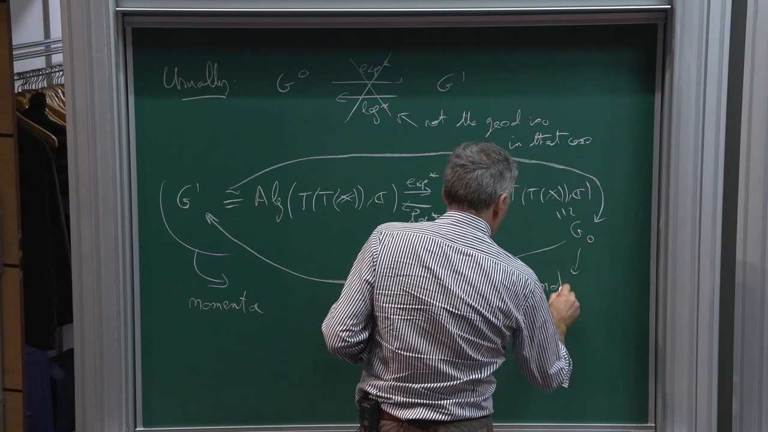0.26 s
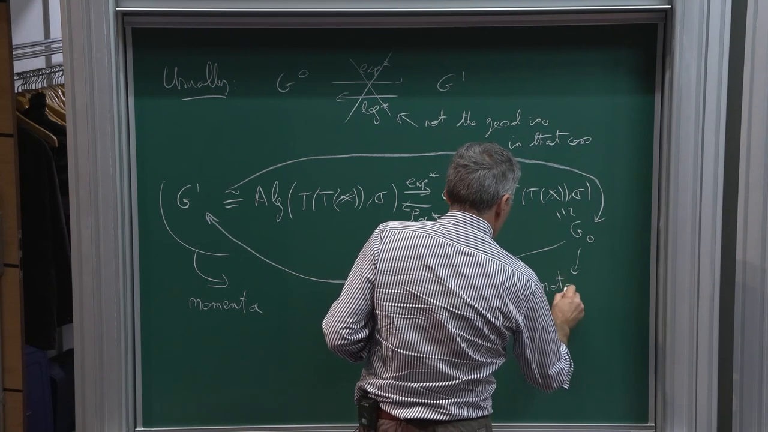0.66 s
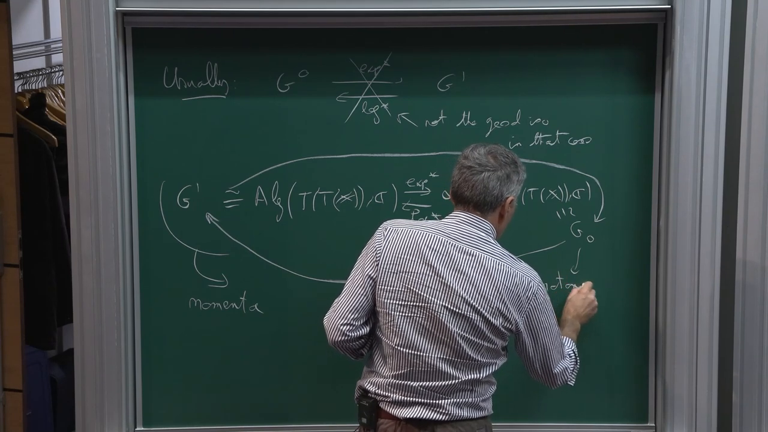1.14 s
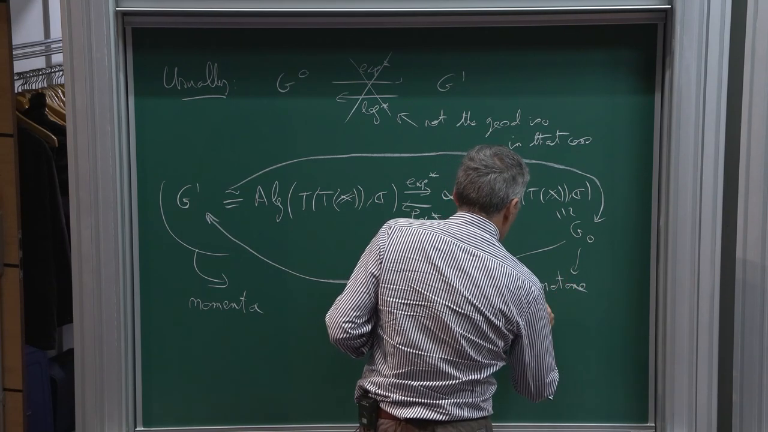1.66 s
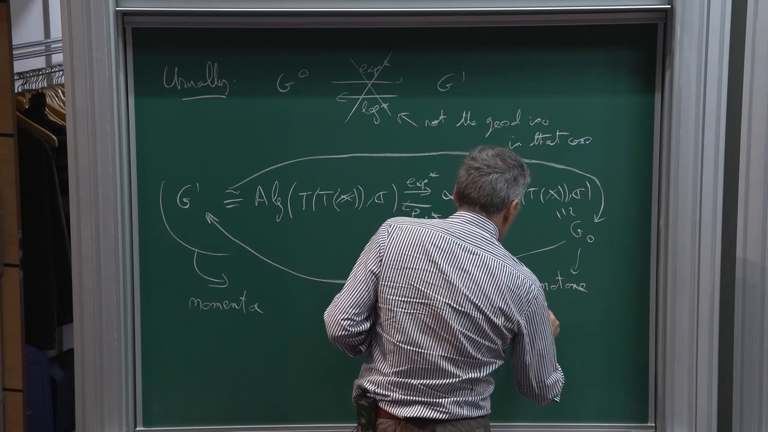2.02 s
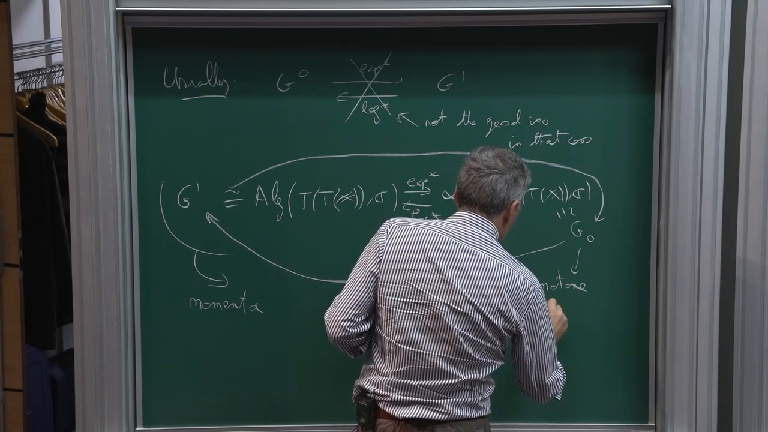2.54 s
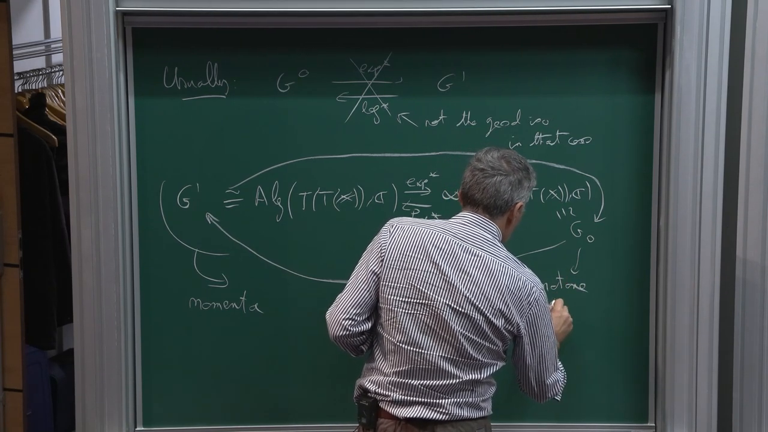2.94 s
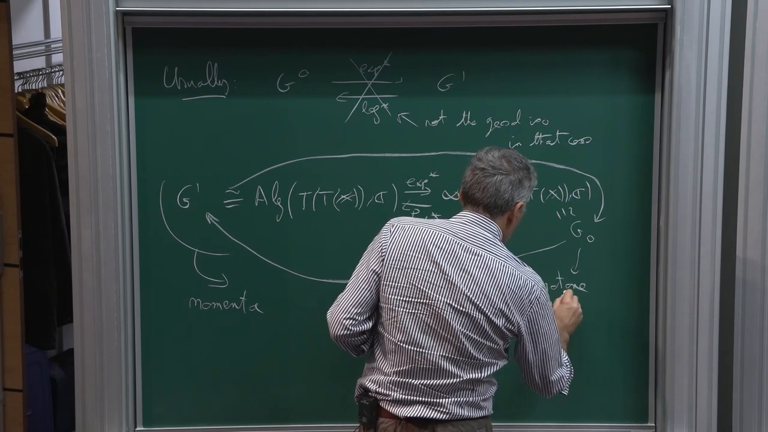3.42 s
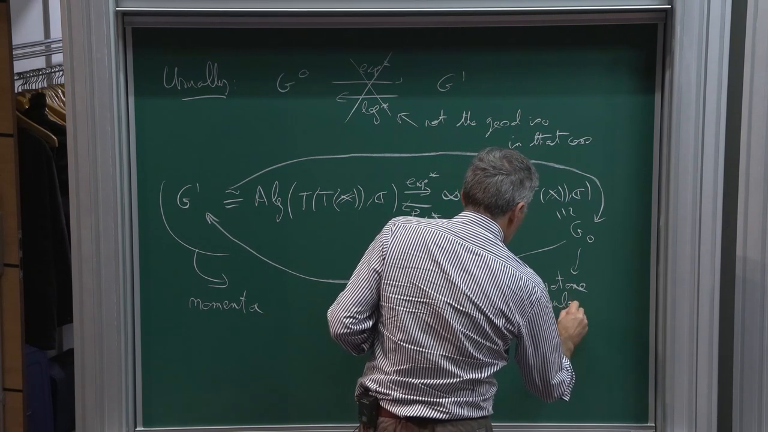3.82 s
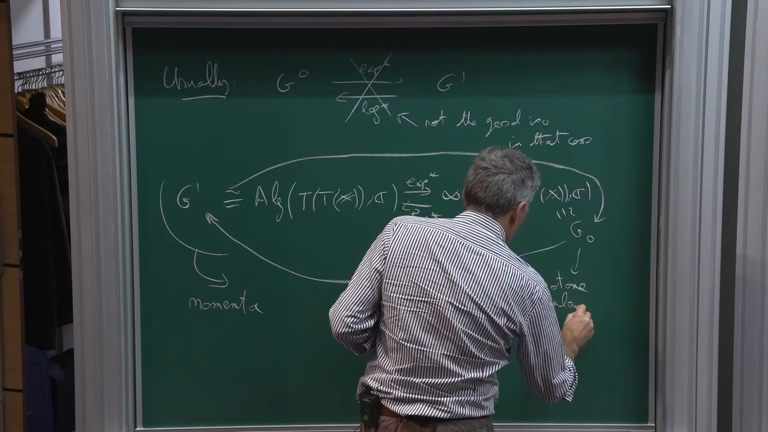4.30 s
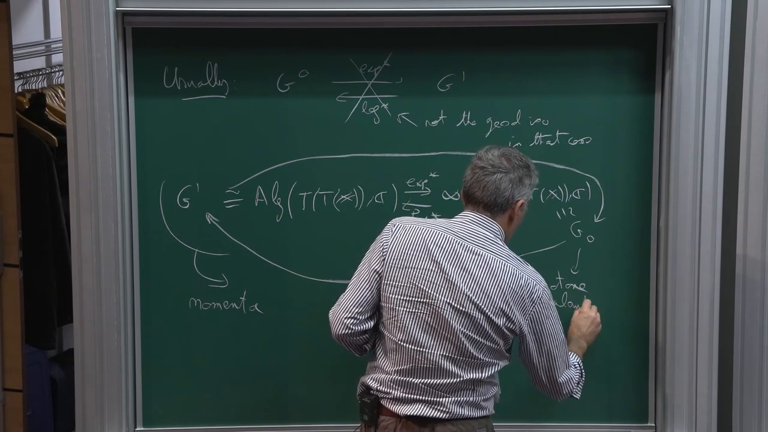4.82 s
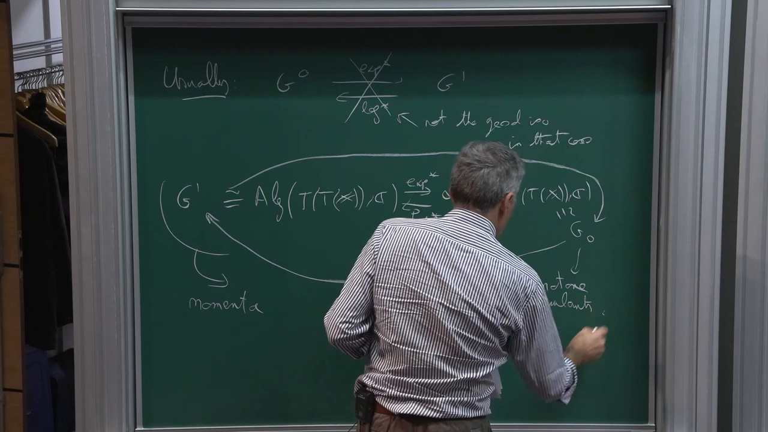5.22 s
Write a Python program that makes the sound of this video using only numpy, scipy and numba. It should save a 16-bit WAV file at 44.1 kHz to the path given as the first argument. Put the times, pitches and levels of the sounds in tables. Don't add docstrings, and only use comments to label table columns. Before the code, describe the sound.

In a quiet lecture room, chalk writes on a large board, heard through a small microphone on the writer's shirt. Soft ventilation rumble, steady thin hiss and restless cloth rustle run throughout. From 0 s, faint gritty strokes swell and halt at each turn. A sharp knock of chalk on board lands at 0.25 s, with another at 0.66 s; light touches and brittle crumb snaps cluster around 0.4-0.55 s. Scratching continues, with a tap at 1.4 s, dull cloth bumps at 1.05 and 1.55 s, and a knock at 1.8 s. The second word begins with a knock at 2.5 s, followed by even scrapes and faint squeaky tones. A short stuttering judder comes at 3.45 s, a duller knock at 3.75 s, low cloth thuds around 4.1 s and a weaker judder at 4.2 s. Two hard clacks, at 5.0 and 5.17 s, the second loudest and brightest, precede the last faint strokes.

```python
import sys
import numpy as np
from scipy import signal
from scipy.fft import rfft, irfft
from scipy.io import wavfile
from scipy.ndimage import uniform_filter1d
from numba import njit

SR = 44100
rng = np.random.default_rng(int(sys.argv[2]) if len(sys.argv) > 2 else 0)


def dump_mix(stems):
    frames = np.atleast_2d(stems).T
    limited = np.clip(frames, -1, 1)
    pcm = np.round(limited * 32767).astype(np.int16)
    wavfile.write(sys.argv[1], SR, pcm)


def natural_amplitude(level_db):
    exponent = np.asarray(level_db, float) / 20
    return 10 ** exponent


N = 240518
TIME = np.arange(N) / SR


def unit(x):
    return x / np.sqrt(np.mean(x ** 2))


def noise(n):
    return rng.standard_normal(n)


def colour(x, points):
    hz, db = np.transpose(points)
    f = np.fft.rfftfreq(len(x), 1 / SR) + 1
    gain = natural_amplitude(np.interp(np.log(f), np.log(hz), db, left=-90, right=-90))
    return unit(irfft(rfft(x) * gain, len(x)))


def band(x, lo_hz, hi_hz):
    return signal.sosfilt(signal.butter(2, [lo_hz, hi_hz], "band", fs=SR, output="sos"), x)


@njit
def svf(x, hz, width_hz):
    y, b, l = np.empty(len(x)), 0., 0.
    for i in range(len(x)):
        g = np.tan(np.pi * hz[i] / SR)
        k = width_hz / hz[i]
        v = (b + g * (x[i] - l)) / (1 + g * (g + k))
        b = 2 * v - b
        l = l + 2 * g * v
        y[i] = k * v
    return y


def fade(t, t60_s):
    return np.exp(-np.log(1000) * t / t60_s)


def rise(t, rise_s):
    return np.minimum(t / rise_s, 1)


def walk(rate_hz):
    k = int(SR / rate_hz)
    return 1.2 * uniform_filter1d(np.repeat(noise(N // k + 1), k), k)[:N]


def add(out, s, sound):
    i = int(s * SR)
    out[i:i + len(sound)] += sound[:N - i]


def ring(modes, t, scatter_db, drift):
    hz, db, t60_s = np.transpose(modes)[:, :, None]
    chance = rng.standard_normal((2, len(modes), 1))
    level = natural_amplitude(db + scatter_db * chance[0]) * fade(t, t60_s)
    sound = np.sum(level * np.sin(2 * np.pi * hz * (1 + drift * chance[1]) * t), axis=0)
    return sound / np.abs(sound).max()


def clusters(modes, centre_hz, fall_db, count=3):
    return [(hz, db - fall_db * np.log2(hz / centre_hz) ** 2, t60_s) for hz, db, t60_s in modes] * count


def rubbed(modes, grains, damping, drift):
    out, bend = 0, 1 + drift * walk(6.8)
    for hz, db, t60_s in modes:
        width_hz = damping * np.log(1000) / np.pi / t60_s
        drive = grains * natural_amplitude(db + 2.5 * walk(14))
        out = out + svf(drive, hz * bend, width_hz) / np.sqrt(width_hz / SR)
    return out / np.linalg.norm(natural_amplitude(np.array(modes)[:, 1]))


# f/Hz, level/dB per Hz
RUMBLE = [(8.8, -58), (15, 14.5), (43, -7.5), (101, 6.5), (175, -5.5), (257, -9.5), (454, -17),
          (999, -26.5), (1090, -127), (1200, -120), (1560, -36.5), (2640, -120)]
# f/Hz, level/dB per Hz
HISS = [(400, -10), (700, 0), (2600, -8), (3800, -10), (5000, -5), (6300, -3), (8500, -9), (12700, -13),
        (13100, -50), (16000, -60)]
# t/s, rustle level/dB
STIR = [(0.0, -62.5), (0.4, -61), (1.05, -58), (1.4, -56.5), (1.65, -65.5), (1.9, -58), (2.3, -60.5),
        (2.85, -62), (3.45, -67), (3.64, -61.5), (3.75, -59), (4.1, -65), (4.25, -59), (4.6, -58),
        (4.8, -59.5), (5.1, -60.5), (5.45, -59.5)]


def air():
    stir_db = np.interp(TIME, *np.transpose(STIR)) + 1.5 * walk(16)
    low = colour(noise(N), RUMBLE)
    deep_db = -56.5 + 0.62 * (stir_db - stir_db.mean()) + 0.37 * walk(22) + walk(25)
    rustle_db = stir_db + 3 + 0.3 * walk(7) + 1.4 * walk(30)
    deep = unit(band(low, 24, 113.6)) * natural_amplitude(deep_db)
    rustle = unit(band(low, 141.4, 800)) * natural_amplitude(rustle_db)
    hiss = colour(noise(N), HISS) * natural_amplitude(-71 + 0.4 * walk(9.6))
    return deep + rustle + hiss


# t/s, peak level/dB, f/Hz, t60/s
BUMPS = [
    (0.415, -55.5, 195, 0.074),
    (1.045, -46.5, 106, 0.14),
    (1.565, -45, 127, 0.0054),
    (4.069, -51.5, 78.4, 0.14),
    (4.148, -38, 118, 0.028),
    (4.322, -55, 330, 0.036),
]


def cloth_bumps():
    out, t = np.zeros(N), TIME[:SR // 5]
    for s, db, hz, t60_s in BUMPS:
        thud = np.sin(2 * np.pi * hz * t * (0.98 + 1.2 * fade(t, 0.035)))
        add(out, s, natural_amplitude(db + 9.5) * thud * fade(t, t60_s))
    return out


# t/s, peak level/dB, f/Hz
SNAPS = [(0.2268, -40, 5960), (0.395, -39.5, 5300), (0.4204, -40, 7300), (0.466, -43, 7600),
         (0.465, -53.5, 2600), (4.146, -46.5, 1700), (1.477, -50, 9000), (1.487, -45.5, 8600),
         (1.52, -42, 6360), (1.5367, -43, 5950), (2.2653, -44, 4870), (3.629, -48, 6340),
         (3.697, -47, 11500), (1.52, -54, 1950), (1.537, -52.5, 1950), (4.714, -53, 1182),
         (4.714, -43, 5000)]


def snaps():
    out, t = np.zeros(N), TIME[:SR // 5]
    for s, db, hz in SNAPS:
        burst = noise(len(t)) * fade(t, 0.0084) * rise(t, 0.0016)
        snap = band(burst, hz / 1.29, min(hz * 1.28, 13000))
        add(out, s, natural_amplitude(db) * snap / np.abs(snap).max())
    return out


# t/s, length/s, f/Hz, width/octaves, level/dB
GRINDS = [(0.402, 0.037, 1120, 0.66, -55), (0.531, 0.068, 1300, 1.1, -59), (0.53, 0.034, 8400, 0.72, -48),
          (1.207, 0.055, 1390, 0.29, -52.5), (1.369, 0.058, 1240, 1.6, -54), (1.12, 0.25, 6900, 0.25, -70),
          (1.24, 0.073, 10500, 0.3, -54), (1.905, 0.17, 1700, 0.87, -62), (1.2, 0.088, 11000, 0.26, -55),
          (2.618, 0.1, 1700, 0.84, -61.5), (2.82, 0.15, 1800, 1.6, -64), (3.029, 0.077, 1540, 0.96, -55.5),
          (3.033, 0.06, 8800, 0.26, -53), (3.12, 0.07, 9800, 0.31, -67), (3.214, 0.076, 1900, 0.4, -59),
          (3.36, 0.19, 1810, 1.2, -56), (3.333, 0.21, 7800, 0.68, -55), (3.626, 0.045, 6740, 0.27, -54),
          (3.62, 0.079, 1370, 0.86, -61.5), (3.823, 0.12, 1850, 0.69, -57.5), (4.169, 0.1, 1700, 0.96, -61),
          (4.219, 0.19, 730, 0.86, -63), (3.75, 0.08, 550, 0.5, -58), (1.2, 0.1, 3200, 0.76, -62),
          (4.493, 0.066, 790, 0.56, -60), (4.441, 0.14, 1650, 0.88, -58), (4.598, 0.09, 6100, 0.31, -60),
          (4.771, 0.077, 2000, 0.41, -64), (5.243, 0.23, 5500, 0.98, -61.5)]


def grinds():
    out = np.zeros(N)
    for s, length_s, hz, octaves, db in GRINDS:
        part = np.linspace(0, 1, int(length_s * SR))
        size_db = 2 * np.minimum(rng.exponential(size=len(part)), 5)
        grit = noise(len(part)) * natural_amplitude(size_db)
        half = 2 ** (octaves / 2)
        add(out, s, natural_amplitude(db) * unit(band(grit, hz / half, hz * half)) * np.sin(np.pi * part))
    return out


# t/s, length/s, start f/Hz, end f/Hz, level/dB
SINGS = [(0.518, 0.066, 2650, 2670, -78), (0.526, 0.033, 7800, 7640, -55), (0.535, 0.047, 1610, 1600, -54),
         (0.551, 0.033, 1030, 1025, -51.5), (0.86, 0.056, 5070, 5130, -68), (1.027, 0.041, 1290, 1330, -60),
         (1.105, 0.053, 5160, 5050, -60), (1.121, 0.1, 2470, 2370, -61.5), (1.33, 0.078, 2460, 2440, -57.5),
         (1.33, 0.096, 7900, 8000, -67), (1.818, 0.056, 2320, 2260, -60), (1.82, 0.07, 4820, 4820, -65),
         (1.929, 0.074, 2300, 2300, -59), (2.058, 0.096, 2370, 2300, -67.5), (2.146, 0.06, 5050, 5100, -73),
         (2.265, 0.053, 2325, 2300, -70), (2.32, 0.089, 2065, 2030, -70), (0.518, 0.04, 2720, 2900, -61),
         (0.545, 0.03, 2070, 2060, -60), (1.11, 0.12, 3254, 3220, -65), (1.13, 0.13, 2100, 2030, -67)]
LATER_SINGS = [(2.805, 0.06, 1830, 1850, -64), (2.807, 0.08, 4070, 4140, -65.5),
               (2.91, 0.086, 6360, 6320, -69), (2.997, 0.14, 3960, 4100, -68),
               (3.012, 0.094, 6500, 6420, -65), (3.2, 0.062, 6370, 6400, -65),
               (3.295, 0.09, 6345, 6290, -66), (3.334, 0.11, 1980, 1790, -57.5),
               (3.383, 0.043, 4130, 4050, -63), (3.47, 0.17, 194, 197, -55.5),
               (3.475, 0.11, 1730, 1810, -62.5), (3.5, 0.17, 7380, 7350, -59),
               (3.616, 0.061, 1900, 1810, -59), (3.778, 0.1, 7120, 7140, -54.5),
               (3.99, 0.079, 2550, 2550, -70), (3.99, 0.09, 1850, 1920, -63),
               (4.075, 0.075, 4050, 3950, -66), (4.158, 0.098, 3020, 3740, -62.5),
               (4.218, 0.06, 800, 868, -59.5), (4.278, 0.05, 750, 860, -61.5),
               (4.439, 0.099, 1870, 2130, -73), (4.49, 0.086, 1280, 1470, -62),
               (3.423, 0.051, 7150, 7500, -55), (3.31, 0.11, 5050, 5000, -72),
               (3.55, 0.11, 5300, 5100, -62), (3.62, 0.044, 6170, 7070, -58),
               (4.397, 0.099, 7300, 7500, -66), (4.48, 0.1, 4000, 3930, -65.5),
               (4.755, 0.085, 7300, 7400, -56.5), (4.783, 0.041, 1980, 1950, -64)]


def sings():
    out, flicker, wobble = np.zeros(N), natural_amplitude(4 * walk(70)), 1 + 0.02 * walk(50)
    for s, length_s, from_hz, to_hz, db in SINGS + LATER_SINGS:
        part = np.linspace(0, 1, int(length_s * SR))
        here = slice(int(s * SR), int(s * SR) + len(part))
        hz = (from_hz + (to_hz - from_hz) * np.sin(np.pi / 2 * part)) * wobble[here]
        width_hz = min(90 + 0.045 * min(from_hz, 3000), from_hz / 4)
        tone = svf(svf(noise(len(part)), hz, width_hz), hz, width_hz)
        swell = np.sqrt(np.sin(np.pi * part).clip(0))
        add(out, s, natural_amplitude(db) * unit(flicker[here] * tone) * swell)
    return out


# f/Hz, level/dB, t60/s
BOARD = [(586, 8.5, 0.16), (820, 9, 0.048), (976, 6.5, 0.19), (1183, 0, 0.43), (1315, 5, 0.1),
         (1490, -23, 0.3), (1520, 4.5, 0.23), (1800, -24.5, 0.18), (1910, 7, 0.038), (2040, -0.5, 0.038),
         (2500, 1, 0.083), (2540, -14, 0.076), (2730, 11, 0.12), (3550, 17.5, 0.0087)]
# f/Hz, level/dB, t60/s
BOOM = [(160.9, 0.5, 0.35), (203.7, 6.5, 0.16), (250.6, 0, 0.14), (361, -5, 0.082)]
# t/s, length/s, slip rate/Hz, level/dB
JUDDERS = [
    (3.441, 0.063, 197, -36),
    (4.218, 0.15, 170, -43.5),
]


def judders():
    out, t = np.zeros(N), TIME[:SR // 2]
    for s, length_s, rate_hz, db in JUDDERS:
        phase = np.cumsum(rate_hz * (1 + 0.3 * walk(300)[:len(t)])) / SR
        slips = np.diff(np.floor(phase), prepend=0) > 0
        slips = slips * np.sin(np.pi * rise(t, length_s))
        body = ring(clusters(BOARD, 1270, 6.7), t, 1.5, 0.021) * fade(t, 0.067)
        body = body + natural_amplitude(-18.5) * ring(BOOM[1:3], t, 1.5, 0.0077)
        add(out, s, natural_amplitude(db) * signal.fftconvolve(slips, body)[:len(t)])
    return out


# t/s, peak level/dB, centre f/Hz
TOUCHES = [(0.117, -40.5, 1470), (0.371, -37, 895), (0.474, -32, 860), (0.544, -38, 2000),
           (0.553, -36, 1070), (1.222, -37, 1420), (1.394, -29.5, 1160), (2.264, -43, 1010),
           (3.053, -40, 1440), (3.638, -61, 1600), (3.979, -47, 1010)]


def touches():
    out, t = np.zeros(N), TIME[:SR // 2]
    for s, db, centre_hz in TOUCHES:
        panel = ring(clusters(BOARD, centre_hz, 14), t, 0.97, 0.049)
        add(out, s, natural_amplitude(db) * panel * fade(t, 0.16) * rise(t, 0.00084))
    return out


# f/Hz, level/dB, t60/s
STICK = [(3880, 0, 0.0049), (4590, -1.5, 0.12), (4994, 8.5, 0.047), (5300, 9, 0.084), (5800, 4.5, 0.052),
         (6360, 5.5, 0.13), (6200, -12.5, 0.097), (6960, -16, 0.18), (7300, -24.5, 0.13),
         (7500, -4.5, 0.02), (8130, -40, 0.036), (8520, -4.5, 0.02), (7740, -22.5, 0.01), (8070, 7, 0.01),
         (10020, -36.5, 0.01), (10480, -42, 0.011)]
# f/Hz, level/dB per Hz
CRACK = [(2500, -67), (3800, -5.5), (5000, 8), (6200, 11), (6900, 5), (8000, 7), (9500, -2.5),
         (12000, -11.5), (16000, -38.5)]


def stick_ring(t, tilt_db):
    tilted = [(hz, db + tilt_db * np.log2(hz / 6000)) for hz, db in CRACK]
    decay = natural_amplitude(4.5) * fade(t, 0.0054) + fade(t, 0.05) + natural_amplitude(-14.5) * fade(t, 0.15)
    crack = colour(noise(len(t)), tilted) * decay * natural_amplitude(-8.5)
    return crack + ring(STICK, t, 0.58, 0.01)


# f / knock centre, level/dB, t60/s
KNOCK = [(0.62, -1, 0.0097), (1.1, 2, 0.013), (1.9, -2.5, 0.0073)]


def panel_ring(t, centre_hz, spot, held_t60_s):
    own = [(hz, db, 0.075 * (hz / 1000) ** -0.5) for hz, db in spot]
    modes = natural_amplitude(-1.5) * ring(clusters(BOARD, centre_hz, 9.3, count=5), t, 3, 0.0248)
    first_swings = 1 + natural_amplitude(2) * fade(t, 0.022)
    modes = modes + natural_amplitude(-7.5) * ring(own * 2, t, 1, 0.012) * first_swings
    wash = natural_amplitude(0.5) * fade(t, 0.075) + natural_amplitude(-18.5) * fade(t, 0.14)
    spread = band(noise(len(t)), 546, 2090) * wash
    bite = band(noise(len(t)), 0.33 * centre_hz, 2940) * fade(t, 0.0061) * natural_amplitude(9)
    edge = band(noise(len(t)), 2700, 3340) * fade(t, 0.043) * natural_amplitude(-3)
    panel = (modes * fade(t, held_t60_s) + spread + bite + edge) * rise(t, 0.0044)
    for ratio, db, t60_s in KNOCK:
        jump = np.sin(2 * np.pi * ratio * centre_hz * t) * fade(t, t60_s)
        panel = panel + natural_amplitude(db) * jump * rise(t, 0.0014)
    return panel


# t/s, peak level/dB, stick ring re peak/dB, knock centre f/Hz, contact/ms
TAPS = [
    (0.2495, -16.5, -13.5, 1136, 0.14),
    (0.664, -19.5, -9.5, 1160, 0.23),
    (1.7773, -17, -20, 1083, 0.4),
    (2.498, -21.5, -7, 1263, 0.26),
    (3.751, -16.5, -21, 1205, 0.21),
    (4.9925, -13, -12.5, 1305, 0.2),
    (5.1695, -10.5, -8.5, 1495, 0.097),
]
# f/Hz, level/dB
SPOTS = [
    [(565.2, -58), (1012, -30.5), (1287, -54), (2309, -49), (3558, -37)],
    [(565.2, -53), (1001, -62), (1249, -33), (1669, -63), (2186, -68), (2676, -22), (3219, -46),
     (3666, -67)],
    [(549.1, -50), (1114, -51), (1459, -43), (2422, -46), (2842, -61), (4360, -60), (4920, -68),
     (5378, -69), (5814, -62)],
    [(554.5, -52), (1292, -47), (2659, -52), (3714, -73)],
    [(570.6, -74), (1244, -47), (1497, -57), (2649, -39), (3138, -40), (3343, -50)],
    [(581.4, -57), (1050, -45), (1324, -29), (1497, -45), (2412, -36), (2702, -64), (2923, -53),
     (3451, -57), (3666, -61)],
    [(581.4, -56), (1039, -60), (1701, -17), (2433, -37), (2638, -50), (2966, -35), (3230, -26),
     (3709, -59)],
]
# push level/dB, sheet heave level/dB, crack tilt/dB per octave
STRIKES = [
    (1.5, -13.5, 18),
    (-1.5, -11, -1),
    (-12, -15, -16),
    (-17, -9, 8),
    (-12, -15, -8),
    (-12, -15, 8),
    (-1, -13, 8.3),
]
HELD_T60_S = [0.3, 0.3, 0.22, 0.14, 0.32, 0.28, 0.22]


def taps():
    out, t = np.zeros(N), TIME[:SR // 2]
    heave = np.sin(2 * np.pi * 18 * t ** 0.808) * fade(t, 0.23) * natural_amplitude(-2.5)
    for tap, spot, strike, held_t60_s in zip(TAPS, SPOTS, STRIKES, HELD_T60_S):
        s, db, stick_db, centre_hz, contact_ms = tap
        push_db, heave_db, tilt_db = strike
        push = np.sin(np.pi * rise(t[:64] * 1000, contact_ms)) ** 2
        panel = panel_ring(t, centre_hz, spot, held_t60_s)
        blow = np.convolve(panel, push / push.sum())[:len(t)]
        blow[:64] -= natural_amplitude(push_db) * push
        stick = natural_amplitude(stick_db) * stick_ring(t, tilt_db)
        boom = natural_amplitude(-12) * ring(BOOM * 2, t, 2.5, 0.008)
        add(out, s, natural_amplitude(db) * (blow + stick + boom + natural_amplitude(heave_db) * heave))
    return out


def patches(x):
    edges_hz = 2500 * 2 ** np.arange(0, 2.9, 1 / 3)
    out = 0
    for k, (lo_hz, hi_hz) in enumerate(zip(edges_hz, edges_hz[1:])):
        out = out + band(np.roll(x, 4001 * k), lo_hz, hi_hz) * natural_amplitude(1.7 * walk(14))
    return unit(out)


# turn t/s, level at turn/dB, level at top speed/dB, board re scrape/dB
FIRST_WORD = [(0.0, -58, -66.5, -0.5), (0.098, -75, -58, -7.5), (0.146, -79, -69.5, -16),
              (0.25, -55.5, -50.5, -6), (0.382, -56, -59, -6), (0.451, -72, -56, -3.5),
              (0.514, -62.5, -51, -4.5), (0.586, -73, -61.5, -7), (0.655, -68, -55, -11),
              (0.805, -59, -55, -1.5), (0.987, -69, -56, -1.5), (1.085, -66.5, -51.5, -4.5),
              (1.22, -56.5, -53.5, -3), (1.332, -57.5, -50.5, -6), (1.417, -67, -66, 1),
              (1.465, -66, -63.5, -5.5), (1.589, -64, -66, -4), (1.72, -71, -71, -10), (1.8, -70, -52, -7),
              (1.908, -53, -52, -2), (2.052, -67, -55.5, -9.5), (2.16, -57, -54.5, -1),
              (2.252, -59.5, -58.5, -8.5), (2.407, -70, -63, -3.5)]
SECOND_WORD = [(2.49, -68, -55.5, -13), (2.599, -71, -53.5, -2), (2.704, -68, -56, -8),
               (2.806, -70, -55.5, -1.5), (2.908, -63, -57, -5), (3.004, -65, -55.5, -2.5),
               (3.099, -67, -55.5, -6.5), (3.203, -61, -58, -1), (3.29, -77, -51.5, -7.5),
               (3.537, -56.5, -54, -6), (3.614, -57.5, -50.5, -4), (3.675, -67, -67, -2.5),
               (3.745, -58.5, -55.5, -13), (3.912, -58, -58, 0), (3.981, -69, -54.5, -9.5),
               (4.08, -64, -62.5, 4), (4.167, -62, -56, -1.5), (4.248, -69, -57.5, -2.5),
               (4.355, -68, -53, -7.5), (4.495, -56.5, -54.5, -2), (4.578, -65, -55, -4.5),
               (4.702, -67, -58, -3), (4.764, -59, -54, -4.5), (4.83, -58, -58.5, -3),
               (4.895, -70, -67.5, -11), (5.0, -78, -52, 5), (5.06, -58, -67, -5), (5.12, -68, -66, -9),
               (5.2, -62, -65.5, 2), (5.413, -64.5, -63, -2)]
# t/s, f/Hz
GRIP = [(0.0, 5900), (0.3, 7800), (0.42, 5300), (0.53, 8400), (0.88, 5180), (1.05, 8660), (1.35, 8030),
        (1.6, 6140), (1.85, 5300), (2.0, 8860), (2.33, 4980), (2.55, 8460), (3.1, 9180), (3.4, 7160),
        (3.85, 6600), (4.45, 7360), (4.8, 7100), (5.45, 6040)]
# f/Hz, level/dB per Hz
SCRAPE = [(2100, -35), (2600, -4), (3400, -9), (4300, 2.5), (5100, 3.5), (7500, 6.5), (9000, 5),
          (10800, 5.5), (13000, 0.5), (15500, 2), (16300, -20)]


def strokes():
    turn_s, turn_db, top_db, board_db = np.transpose(FIRST_WORD + SECOND_WORD)
    top_s = turn_s + 0.5 * np.diff(turn_s, append=N / SR)
    knots_s = np.ravel([turn_s, top_s], order="F")
    levels = natural_amplitude(np.ravel([turn_db, top_db], order="F"))
    place = np.interp(TIME, knots_s, np.arange(len(knots_s)))
    k = np.minimum(place.astype(int), len(knots_s) - 2)
    angle = np.pi / 2 * (place - k)
    arch = np.where(k % 2 == 0, np.sin(angle), 1 - np.abs(np.cos(angle)))
    speed = levels[k] + (levels[k + 1] - levels[k]) * arch

    size_db = 2 * np.minimum(rng.exponential(size=N), 5) + 2.03 * walk(150)
    grains = unit(noise(N) * natural_amplitude(size_db))
    wander = uniform_filter1d(rng.uniform(-1.3, 1, len(turn_s))[k // 2], SR // 50)
    grip_hz = np.interp(top_s, *np.transpose(GRIP))[k // 2] * (1 + 0.036 * wander)
    grip = unit(svf(svf(grains, grip_hz, 1300.), grip_hz, 1300.)) * natural_amplitude(-8 + 3.5 * walk(25))
    hiss = patches(colour(grains, SCRAPE)) + grip
    stick = band(rubbed(STICK, grains * speed, 1.8, 0.02), 4000, 11500) * natural_amplitude(-12)

    push = grains * speed * natural_amplitude(np.interp(TIME, top_s, board_db))
    rub = band(push, 420, 2600) * natural_amplitude(-6)
    octaves = -0.05 * (20 * np.log10(speed) + 48.5) + 0.34 * walk(21)
    focus = svf(push, np.clip(1950 * 2 ** octaves, 700, 2500), 300.) * natural_amplitude(13)
    panel = rubbed(BOARD, push, 6, 0.02) * natural_amplitude(-8)
    return speed * hiss + stick + band(focus + panel, 370, 2420) + rub


# f/Hz, level/dB per Hz
ROOM = [(300, 0), (600, -2.5), (1200, -7.5), (2500, -9.5), (3800, -6), (6000, -8), (10000, -25),
        (16000, -29.5)]


def scene():
    t = TIME[:SR // 2]
    floor = air() + cloth_bumps() + snaps()
    chalk = grinds() + sings() + judders() + touches() + taps() + strokes()
    tail = colour(noise(len(t)), ROOM) * fade(t, 0.28) * rise(t, 0.0013)
    room = signal.fftconvolve(chalk, tail)[:N] * natural_amplitude(-44)
    return (chalk + room + floor)[None]


def top_cut(x):
    return signal.sosfilt(signal.butter(12, 16790, fs=SR, output="sos"), x)


def record(dry):
    cut = signal.sosfilt(signal.ellip(8, 0.2, 70, 16000, fs=SR, output="sos"), dry)
    hz, _, cells = signal.stft(cut, SR, nperseg=2048)
    power = uniform_filter1d(np.abs(cells) ** 2, size=8, axis=1)
    nearby = uniform_filter1d(power, size=60, axis=1)
    faint = power < np.maximum(natural_amplitude(2 * -96), natural_amplitude(2 * -1.5) * nearby)
    gone = faint & (hz > 13000)[:, None]
    mix = signal.istft(cells * ~gone, SR, nperseg=2048)[1][:, :N]
    return top_cut(mix)


dry = scene()
out = record(dry)
dump_mix(out)
```